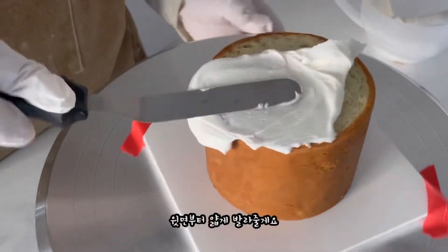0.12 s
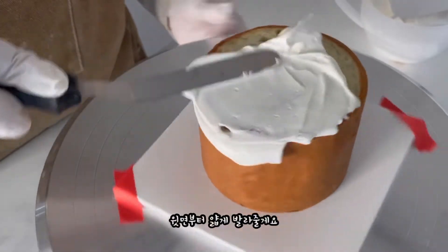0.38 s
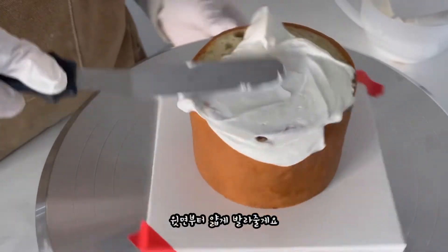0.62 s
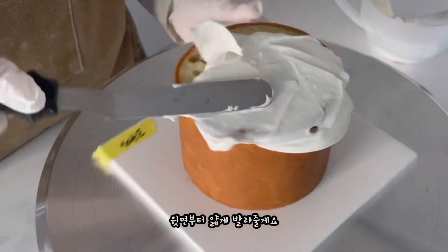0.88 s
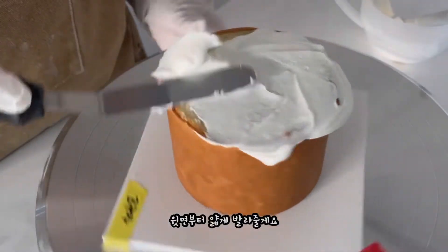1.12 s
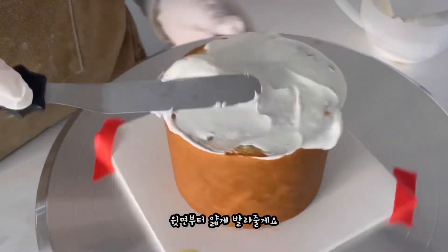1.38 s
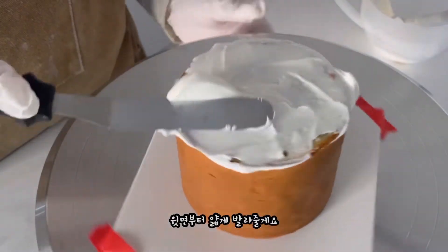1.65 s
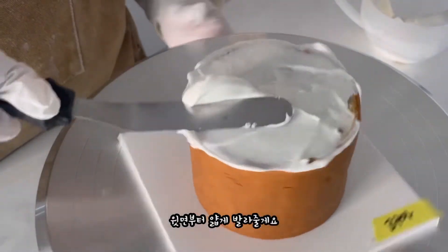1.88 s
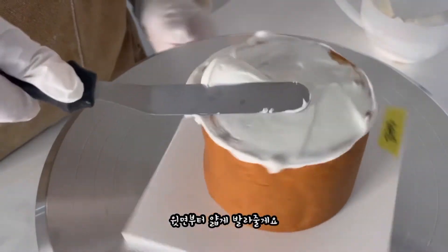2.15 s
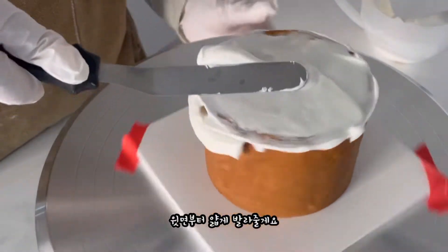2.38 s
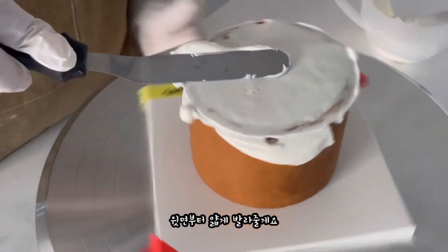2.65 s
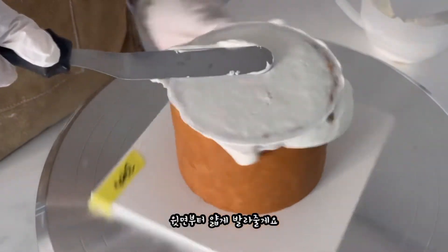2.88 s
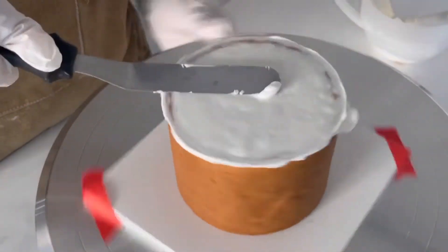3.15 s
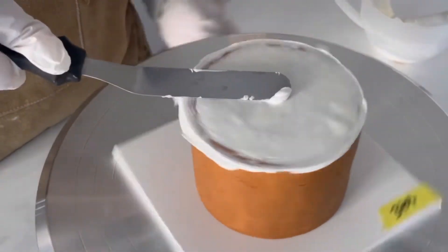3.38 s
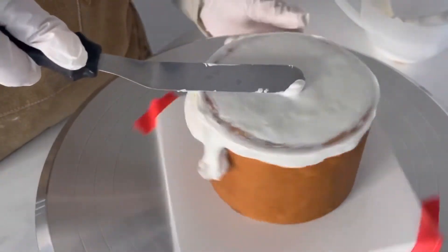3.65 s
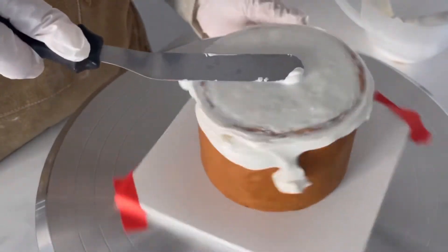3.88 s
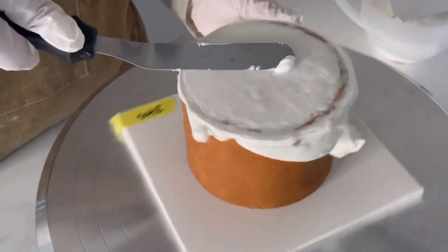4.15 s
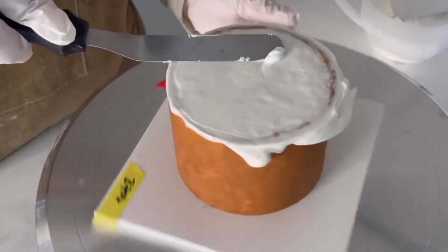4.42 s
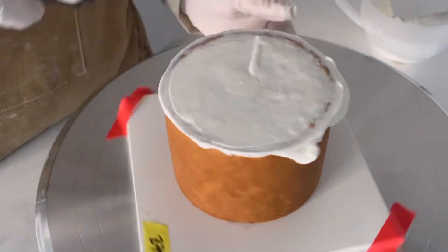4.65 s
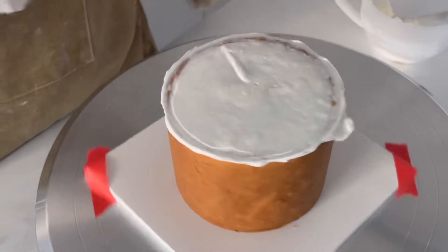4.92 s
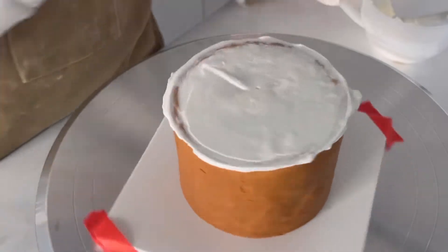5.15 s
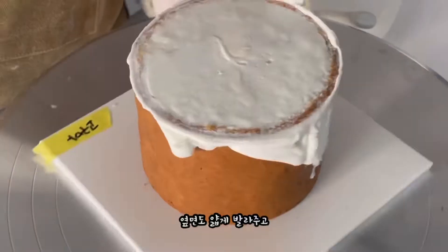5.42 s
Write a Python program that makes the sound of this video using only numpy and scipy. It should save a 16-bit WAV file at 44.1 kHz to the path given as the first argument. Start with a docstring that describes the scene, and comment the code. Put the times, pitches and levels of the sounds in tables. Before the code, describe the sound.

A quiet kitchen with close stereo microphones. A refrigerator hums continuously, low and slightly wavering, over a dim building murmur; its hum thins after about 3 s. The take opens on a faint fading hiss of blade on cream. At 0.7 s a dull, quick cluster of knocks rings the worktop with a short rumble. From 0.9 to 2.9 s come light gritty slips, sparse thin metal ticks and soft deep thumps as the hand pushes the turntable, with weak knocks near 2.1 s. Bright tiny ticks cluster at 3.1-3.2 s beside another thump. A clear, crisp scrape jumps out at 3.5 s, followed by a softer one near 4 s and a sizzling slip with a low drag around 4.5 s. Faint brushing continues until 5.1 s, when the strongest sharp scrape lands together with a rumbling knock. A small sharp knock follows at 5.36 s, then a last light rustle.

```python
"""Spreading cream on a turning cake

A steel spatula spreads cream over a sponge cake on a metal turntable that a gloved hand keeps pushing.
Blade and glove hiss in short slips made of shaped noise; longer drags rumble and scuff.
Knocks, blade ticks and the thumps of the pushes are clicks that set fading tones ringing.
A refrigerator hums with wavering mains tones and noise, over the murmur of the building.
Two close microphone ports hear it all, with a phase turn between them that changes with pitch."""
import sys
import numpy as np
from scipy import signal
from scipy.fft import rfft, irfft, next_fast_len
from scipy.io import wavfile

SR = 44100
rng = np.random.default_rng(int(sys.argv[2]) if len(sys.argv) > 2 else 0)


def inscribe(sig):
    """Save sig as 16-bit PCM at rate SR to the path in sys.argv[1].

    A 1-D sig is mono; a 2-D sig holds one channel per row.
    Samples are clipped to [-1, 1] before scaling.
    """
    pcm = np.round(np.clip(np.atleast_2d(sig).T, -1, 1) * 32767)
    wavfile.write(sys.argv[1], SR, pcm.astype(np.int16))


def invert_db(x):
    """Field ratio 10**(x/20) for x, a level in decibels (scalar or array-like)."""
    u = np.asarray(x, float) / 20
    return 10 ** u


N = 243961  # length in samples

# refrigerator over time: (time [s], third harmonic before balance [dB], drone [dB])
FRIDGE_LEVELS = [(0.0, -44, -47.5), (.25, -43.5, -45.5), (.35, -40, -46), (.6, -40.5, -46.5),
                 (.9, -36.5, -46.5), (1.15, -45.5, -47), (1.41, -39, -46), (1.75, -41.5, -47),
                 (1.91, -48, -47), (2.04, -40.5, -45.5), (2.56, -41.5, -48), (2.65, -49.5, -49),
                 (2.93, -39.5, -47.5), (3.08, -56.5, -49.5), (3.4, -46.5, -53), (3.9, -46.5, -53.5),
                 (4.4, -49, -51.5), (5.3, -46, -53), (5.53, -37, -54.5)]
# further hum tones: (multiple of the mains pitch, level above the drone [dB])
HUM_TONES = [(4, -6.5), (6, -15.5)]
# lowest hum tone over time: (time [s], level [dB])
LOWEST_HUM = [(3.5, -59), (3.84, -52), (4.05, -58), (4.2, -49), (4.53, -44.5), (4.63, -58), (4.73, -46),
              (4.94, -53), (5.31, -44.5), (5.53, -62)]
# rough band beside the third harmonic, before balance: (time [s], level [dB])
ROUGH_BAND = [(0.0, -59.5), (2.95, -55), (3.2, -50), (5.53, -50)]
MAINS_HZ, SECOND_DB = 59.6, -53.5
HUM_BALANCE_DB = -2  # added at the first port, taken away at the second
# hand pushing the rim: (time [s], strength [dB])
RIM_PUSHES = [(1.394, -40), (1.71, -36.5), (2.061, -33), (2.457, -31), (2.874, -33.5), (3.136, -29.5),
              (4.709, -47.5)]
PUSH_HZ, PUSH_T60_S = 71.7, 0.26  # t60: time to fade by 60 dB
# knocks on the worktop: (time [s], strength [dB], contact cut-off [Hz])
WORKTOP_KNOCKS = [(0.705, -35, 3500), (.713, -31, 3000), (.72, -23, 300), (.737, -28, 595),
                  (.757, -28, 500), (0.775, -28, 400), (0.798, -30, 300), (2.111, -38.5, 1520),
                  (2.131, -39.5, 1030), (5.109, -43.5, 2500), (5.13, -40.5, 690), (5.165, -34.5, 396),
                  (5.197, -52, 700), (5.362, -34, 6900)]
# tones of the worktop: (pitch [Hz], level [dB], t60 [s])
WORKTOP_MODES = [(86.3, -8, 0.44), (115.6, -6.5, 0.22), (148, -5.5, 0.14), (180.96, 1.5, 0.36),
                 (251, -6.5, 0.2), (321, -7, 0.17), (422, -20, 0.21), (506, -7, 0.12), (633, -3, 0.059),
                 (800, -13.5, 0.33), (1014, -5, 0.042), (1220, -26, 0.044), (1302, -10, 0.062),
                 (1665, -9, 0.047), (1896, -13.5, 0.031), (2420, -27, .04), (3000, -24, 0.018)]
# touches of the blade: (time [s], strength [dB], leading pitch [Hz])
BLADE_TOUCHES = [(0.9175, -53.5, 1840), (1.0394, -55, 2860), (1.3, -54, 3180), (1.685, -60, 2820),
                 (2.423, -53, 4920), (2.505, -49, 2750), (2.546, -53, 5900), (2.823, -49.5, 1870),
                 (2.95, -56, 2770), (3.072, -56, 1830), (3.099, -51, 4390), (3.1684, -45, 5700),
                 (3.19, -52, 1850), (3.198, -45, 5900), (3.2068, -46.5, 1870), (3.988, -47, 2250)]
# tones of the blade: (pitch [Hz], level [dB], t60 [s])
BLADE_MODES = [(1870, 3.5, 0.11), (2240, -5.5, 0.045), (2764, -3.5, 0.1), (3170, -14, 0.056),
               (4270, -3.5, 0.07), (4800, -7, .04), (5830, 1, 0.036), (6540, -11, .03), (9300, 1.5, 0.035),
               (12500, -13, .015)]

# The spectra give only the colour of a noise; its overall level is set elsewhere.
# hiss of a slip: (frequency [Hz], relative density [dB per Hz])
HISS_COLOUR = [(500, -19.5), (1200, 0.5), (2000, -3), (3300, 0), (4600, -2), (5600, -3), (7000, -5),
               (8500, -4), (11000, -34)]
# brighter sizzle of a slip: (frequency [Hz], relative density [dB per Hz])
SIZZLE_COLOUR = [(4000, -27), (6500, 3), (8000, -1.5), (10200, -1.5), (11500, -3.5), (13000, -6.5),
                 (15700, -2), (16200, -48)]
# edge of a hard slip: (frequency [Hz], relative density [dB per Hz])
BITE_COLOUR = [(3000, -42), (4600, -6.5), (5500, -2), (6300, -9), (8000, -40)]
# table shaken by a drag: (frequency [Hz], relative density [dB per Hz])
RUMBLE_COLOUR = [(60, -21), (150, 4), (350, 2.5), (500, 2), (1200, -11), (2200, -22), (5000, -53)]
# dry edge of a drag: (frequency [Hz], relative density [dB per Hz])
SCUFF_COLOUR = [(500, -16), (900, 6.5), (1600, -2.5), (2500, -10), (3500, -14), (5000, -41)]
# broad drone of the refrigerator: (frequency [Hz], relative density [dB per Hz])
DRONE_COLOUR = [(20, -40), (60, -10.5), (135, -3), (200, -4), (280, -0.5), (320, -9.5), (420, -8),
                (500, -11), (630, -10.5), (780, -14.5), (960, -15.5), (1500, -24.5), (2500, -32),
                (4000, -37), (8000, -69)]
# faint air noise: (frequency [Hz], relative density [dB per Hz])
AIR_COLOUR = [(1000, -6), (2000, -8), (5000, 4), (8000, 5.5), (12000, -21), (15500, -7), (16200, -50)]
# low murmur of the building: (frequency [Hz], relative density [dB per Hz])
BUILDING_COLOUR = [(20, -38), (30, -30), (40, 1.5), (55, -10), (75, -0.5), (95, -9.5), (140, 2.5), (165, 1),
                   (220, -37), (400, -47)]
AIR_DB, BUILDING_DB = -75, -52.5

# microphone pair: (frequency [Hz], phase by which the second port leads [radians], likeness [0-1])
PORT_PAIR = [(0, 1, 0.92), (99, -0.5, 0.99), (172, 0.52, 0.91), (277, 0.2, 0.52), (500, -1.5, 0.53),
             (1300, -2, 0), (1840, 1.5, 0.46), (3500, -1.4, 0.39), (5000, 0, 0.7), (6530, 2.5, 0.97),
             (7440, 3, 0.98), (8150, 3.5, 0.95), (10800, 6.5, 1), (12100, 6.5, 0.95), (13760, 9.5, 0.82),
             (15400, 10, 1), (16100, 9, .95)]
# slips of blade and glove: (full level reached [s], rise [s], hold [s], fade [s],
# strength before the layer levels [dB], extra strength of the sizzle [dB])
SLIP_EVENTS = [(0.0, .01, 0.023, 0.21, -62, -4.5), (.2, .2, 0.19, .02, -71, -1),
               (0.544, .15, 0.15, .2, -71, -5.5), (0.73, 0.27, .001, 0.09, -67, -5),
               (0.893, 0.072, .19, 0.022, -68, -3), (1.248, 0.027, 0.018, 0.13, -71.5, -2.5),
               (1.302, .01, .001, 0.29, -66.5, -13), (1.485, 0.086, 0.054, 0.11, -61, -2.5),
               (1.682, .01, 0.13, 0.12, -64, -8), (1.921, .008, .01, .11, -66, 6),
               (2.012, .01, 0.15, .04, -64, -8), (2.193, .05, 0.19, .05, -77.5, -4),
               (2.423, 0.0083, .001, 0.1, -62, -9), (2.528, 0.21, .001, .13, -65.5, -4),
               (2.61, 0.0075, 0.044, 0.12, -60, 2), (2.825, .01, .001, 0.061, -60.5, -14),
               (2.931, 0.21, .001, 0.13, -63, -5.5), (3.072, .008, 0.035, 0.063, -62.5, -4),
               (3.168, 0.09, 0.021, 0.11, -57.5, -3.5), (3.516, 0.0061, 0.053, 0.12, -51, -1.5),
               (3.66, .1, .001, 0.16, -75, -4), (3.968, .008, 0.017, 0.16, -58, -2),
               (4.32, .2, .001, 0.17, -59.5, -3.5), (4.481, 0.072, 0.043, 0.096, -56, 4),
               (4.42, .2, .001, 0.22, -63, -6), (4.614, 0.058, 0.019, .08, -68.5, 3.5),
               (4.716, 0.012, .001, 0.11, -63, -5), (4.802, 0.18, 0.081, 0.28, -67.5, -6.5),
               (4.936, .1, 0.23, .1, -64, -3.5), (5.147, 0.048, 0.00091, 0.15, -47, 1),
               (5.274, 0.22, 0.11, 0.0069, -59, -5.5), (5.511, 0.053, .001, .04, -65, -6.5)]
# drags that shake the table: (full level reached [s], rise [s], hold [s], fade [s],
# rumble [dB], scuff above the rumble [dB])
DRAG_EVENTS = [(0.721, 0.015, 0.039, 0.12, -38.5, -12), (3.532, 0.025, .001, 0.3, -47.5, -17),
               (4.487, 0.15, .001, 0.24, -42.5, -23), (5.111, 0.02, 0.055, 0.23, -38, -11),
               (5.363, 0.011, .001, 0.032, -41, -12)]
RAMP_DB = 20  # gained over one rise time, lost over one fade time
# layers of a slip, above its strength; the bite grows by a power of the slip
HISS_DB, SQUEAL_DB, SIZZLE_DB, BITE_DB, BITE_GROWTH = 5, -6, 6, 15.5, 1.384


def rms_one(x):
    """Scale to unit rms (average strength 1)."""
    return x / np.sqrt(np.mean(x ** 2) + 1e-20)


def in_time(rows):
    """Turn table columns into curves with one value a sample."""
    s, *columns = np.transpose(rows)
    return [np.interp(np.arange(N) / SR, s, c) for c in columns]


def drift(rate_hz):
    """Slow random wander of spread about 1: low-passed noise, drawn once every 40 samples."""
    r = np.exp(-80 * np.pi * rate_hz / SR)
    raw = rng.standard_normal(N // 40 + 2002)
    slow = signal.lfilter([1], [1, -2 * r, r * r], raw)[2000:]  # skip the filter's start
    return np.interp(np.arange(N) / 40, np.arange(len(slow)), rms_one(slow))


def ring(clicks, hz, t60):
    """A resonance: a unit click starts a sine of height about 1 that fades by 60 dB in t60 seconds."""
    r = 1000 ** (-1 / (t60 * SR))
    w = 2 * np.pi * hz / SR
    return signal.lfilter([0, np.sin(w)], [1, -2 * r * np.cos(w), r * r], clicks + 1e-18)


def soften(x, cut_hz):
    """A soft contact dulls a click: two one-pole low-passes."""
    r = np.exp(-2 * np.pi * cut_hz / SR)
    return signal.lfilter([(1 - r) ** 2], [1, -2 * r, r * r], x)


def ports(direct, around, spectrum=((1, 0), (2, 0))):
    """Colour a sound for two ports: direct part phase-turned between them, reflected part in antiphase."""
    size = next_fast_len(N + 4096)
    hz = np.arange(size // 2 + 1) * SR / size + 1e-3
    at, lead, alike = np.transpose(PORT_PAIR)
    half_turn = 0.5 * np.interp(hz, at, lead)
    turn = np.exp(1j * half_turn * np.array([[-1], [1]]))
    alike = np.clip(np.interp(hz, at, alike), 0, 1)
    colour_hz, colour_db = np.transpose(spectrum)
    colour = invert_db(np.interp(np.log(hz), np.log(colour_hz), colour_db))
    shared = np.sqrt(1 + alike) * rfft(direct, size)
    opposed = np.sqrt(1 - alike) * rfft(around, size) * [[1], [-1]]
    return irfft((shared + opposed) * turn * colour / np.sqrt(2), size)[:, :N]


def noise(spectrum, grit_db=0.0, flicker_db=0.0):
    """Stereo noise of rms 1; grit makes some samples stick out as grains, flicker sways the level."""
    grit = grit_db * np.minimum(rng.exponential(1, N), 6)
    sizes = invert_db(grit + flicker_db * drift(22))
    direct, around = sizes * rng.standard_normal((2, N))
    return rms_one(ports(direct, around, spectrum))


def envelope(rows):
    """Each event ramps up in dB, holds and ramps down; the powers of all events add."""
    t = np.arange(N) / SR
    power = 1e-24
    for s, rise, hold, fade, level_db in rows:
        ramps_away = np.maximum((s - t) / rise, (t - s - hold) / fade)
        power = power + invert_db(level_db - RAMP_DB * np.maximum(ramps_away, 0)) ** 2
    return np.sqrt(power)


def strike(events, modes, cut_hz, spread_db):
    """Each blow rings all modes, each by a chance amount; a sharp contact hardly stirs the low ones."""
    out = np.zeros(N)
    chance = rng.normal(0, spread_db, (len(events), len(modes)))
    for (s, strength_db), cut, own_db in zip(events, cut_hz, chance):
        at = round(s * SR)
        click = soften(signal.unit_impulse(min(SR // 2, N - at)), cut)
        click = click - soften(click, cut / 3.1)  # thin out the lows
        for (hz, level_db, t60), own in zip(modes, own_db):
            out[at:at + len(click)] += invert_db(strength_db + level_db + own) * ring(click, hz, t60)
    return out


def echoes(x, t60=0.36):
    """Nearby surfaces return a short dense tail: fading noise convolved with the sound."""
    t = np.arange(SR // 4) / SR
    tail = rng.standard_normal(len(t)) * 1000 ** (-t / t60)
    return signal.fftconvolve(x, tail / np.sqrt(np.sum(tail ** 2)))[:N]


def squeal(patchy_db):
    """Friction keeps the blade modes sounding, each swelling by its own drift; rms 1."""
    rub = rng.standard_normal(N)
    tones = np.zeros(N)
    for hz, level_db, t60 in BLADE_MODES:
        tones += invert_db(level_db + patchy_db * drift(5.2)) * rms_one(ring(rub, hz, t60))
    return rms_one(ports(tones, echoes(tones, t60=0.08)))


def slips():
    """Blade on cream and glove on steel: gritty friction noise, squeal, sizzle and a bite."""
    slip = envelope([row[:5] for row in SLIP_EVENTS])
    bright = envelope([(*row[:4], row[4] + row[5]) for row in SLIP_EVENTS])
    hiss = invert_db(HISS_DB) * slip * noise(HISS_COLOUR, grit_db=3.5, flicker_db=1.1)
    squeals = invert_db(SQUEAL_DB) * slip * squeal(patchy_db=7.5)
    sizzle = invert_db(SIZZLE_DB) * bright * noise(SIZZLE_COLOUR, grit_db=2.0, flicker_db=2.0)
    # the harder the slip, the more it bites near 5.5 kHz
    bite = invert_db(BITE_DB) * slip ** BITE_GROWTH * noise(BITE_COLOUR, grit_db=3.5, flicker_db=0.5)
    return hiss + squeals + sizzle + bite


def fridge():
    """Mains harmonics that waver, a rough resonant band, a broad drone, building murmur and air."""
    third_db, drone_db = in_time(FRIDGE_LEVELS)
    phase = 2 * np.pi * MAINS_HZ * np.arange(N) / SR
    third = invert_db(third_db + 1.3 * drift(10.4)) * np.sin(3 * phase + 0.53 * drift(4.4))
    lines = invert_db(in_time(LOWEST_HUM)[0]) * np.sin(phase + 0.21 * drift(1.8))
    lines += invert_db(SECOND_DB + 2.4 * drift(2.8)) * np.sin(2 * phase + 1.3 * drift(1.8))
    for multiple, level_db in HUM_TONES:
        level = invert_db(drone_db + level_db + 0.53 * drift(11))
        lines += level * np.sin(multiple * phase + 1.13 * drift(2.2))
    # noise through the same resonance twice
    band = ring(ring(rng.standard_normal(N), 168.4, 0.13), 168.4, 0.13)
    rough = invert_db(in_time(ROUGH_BAND)[0]) * rms_one(band)
    hum = (third + rough) * invert_db([[HUM_BALANCE_DB], [-HUM_BALANCE_DB]]) + lines
    drone = invert_db(drone_db) * noise(DRONE_COLOUR, flicker_db=1.05)
    room = invert_db(BUILDING_DB) * noise(BUILDING_COLOUR) + invert_db(AIR_DB) * noise(AIR_COLOUR)
    return hum + drone + room


def drags():
    """A drag shakes the table: low rumbling noise with a dry scuff."""
    rumble = envelope([row[:5] for row in DRAG_EVENTS])
    scuff = envelope([(*row[:4], row[4] + row[5]) for row in DRAG_EVENTS])
    low = rumble * noise(RUMBLE_COLOUR, grit_db=2.5, flicker_db=2.0)
    return low + scuff * noise(SCUFF_COLOUR, grit_db=3.5, flicker_db=3.0)


def knocks():
    """Knocks ring the heavy worktop, which passes little of the deepest bass."""
    hits = [k[:2] for k in WORKTOP_KNOCKS]
    cuts = [k[2] for k in WORKTOP_KNOCKS]
    rung = strike(hits, WORKTOP_MODES, cuts, spread_db=3.0)
    return signal.sosfilt(signal.butter(2, 80, "high", fs=SR, output="sos"), rung)


def blade_ticks(fall_db=12.5):
    """Where the blade is touched decides which mode leads; the others fall away by dB per octave."""
    out = np.zeros(N)
    for s, strength_db, lead_hz in BLADE_TOUCHES:
        modes = [(hz, level_db - fall_db * abs(np.log2(hz / lead_hz)), t60)
                 for hz, level_db, t60 in BLADE_MODES]
        out += strike([(s, strength_db)], modes, [11000.0], spread_db=1.0)
    return out


def push_thumps():
    """Each push of the hand thumps softly: one low ringing tone."""
    soft_cut_hz = np.full(len(RIM_PUSHES), 90.0)
    thumps = strike(RIM_PUSHES, [(PUSH_HZ, 0, PUSH_T60_S)], soft_cut_hz, spread_db=1.0)
    return invert_db(1.5) * signal.sosfilt(signal.butter(2, 42, "high", fs=SR, output="sos"), thumps)


def blows():
    """Knocks, ticks and thumps at the ports; only knocks and ticks send echoes."""
    sharp = knocks() + blade_ticks()
    direct = sharp + push_thumps() + invert_db(-7) * echoes(sharp, t60=0.18)
    around = invert_db(-3) * echoes(sharp, t60=0.07)
    return ports(direct, around) * invert_db([[-1.1], [1.1]])


def scene():
    """All sources at the two ports."""
    return slips() + fridge() + drags() + blows()


def band_limit(x):
    """A steep low-pass at the top of the band."""
    return signal.sosfilt(signal.butter(12, 15800, fs=SR, output="sos"), x)


def record(dry):
    """Turn the finished mix into the final sound."""
    return band_limit(dry)


dry = scene()
out = record(dry)
inscribe(out)
```